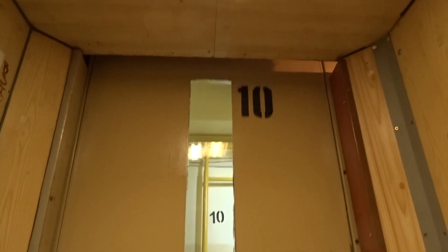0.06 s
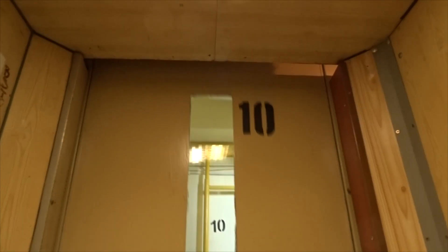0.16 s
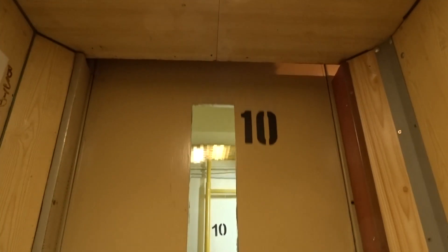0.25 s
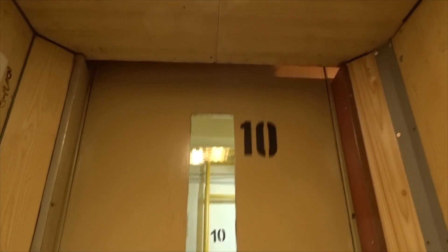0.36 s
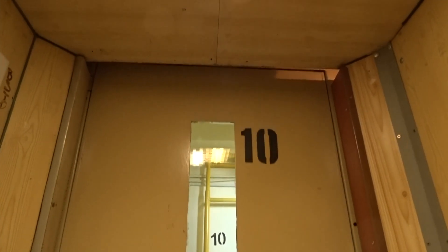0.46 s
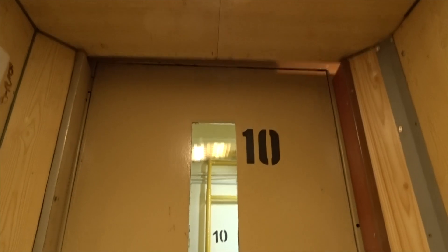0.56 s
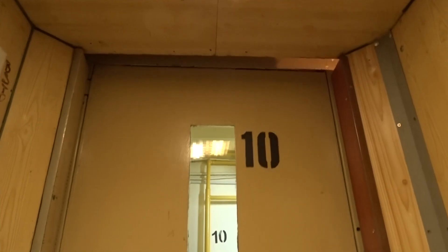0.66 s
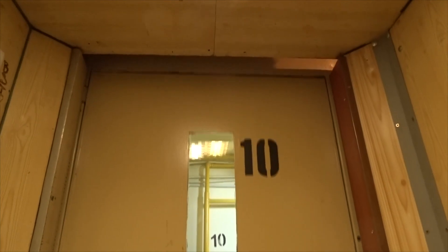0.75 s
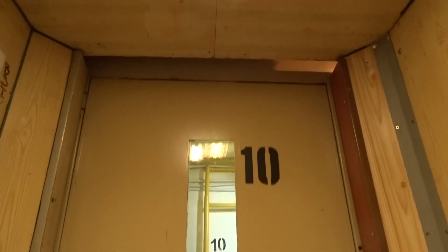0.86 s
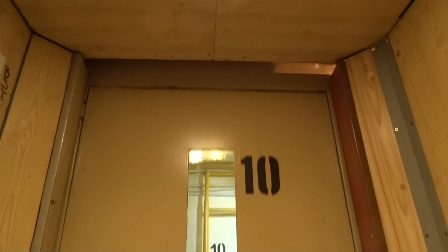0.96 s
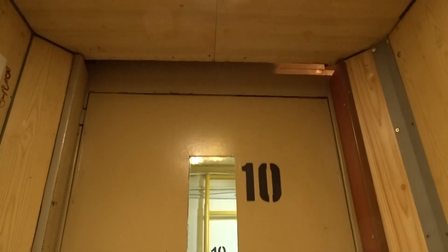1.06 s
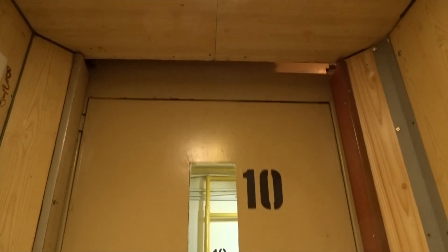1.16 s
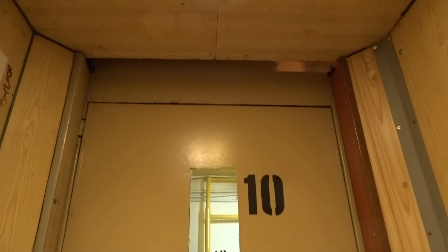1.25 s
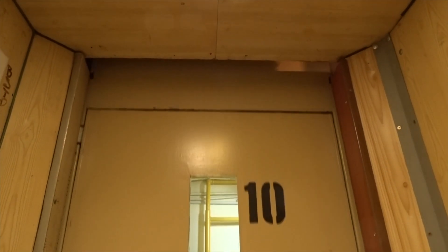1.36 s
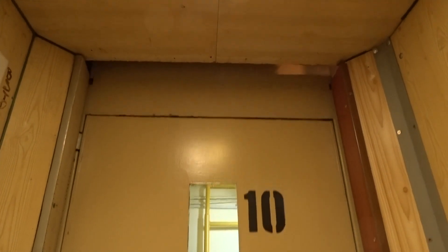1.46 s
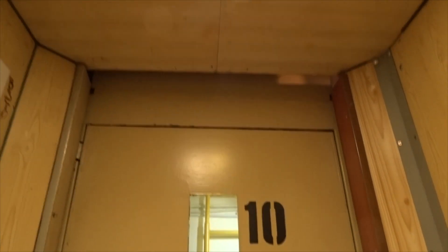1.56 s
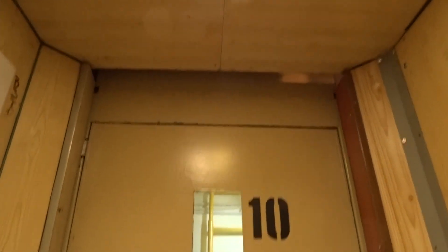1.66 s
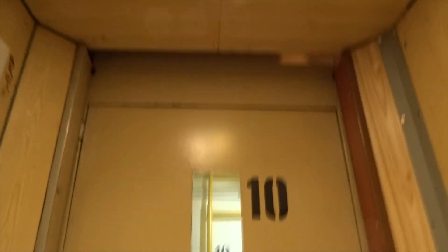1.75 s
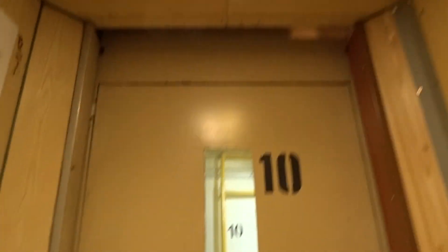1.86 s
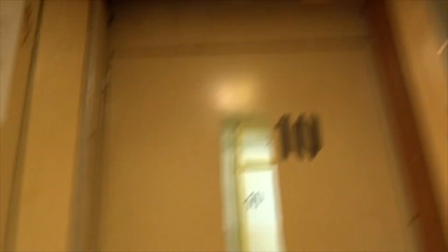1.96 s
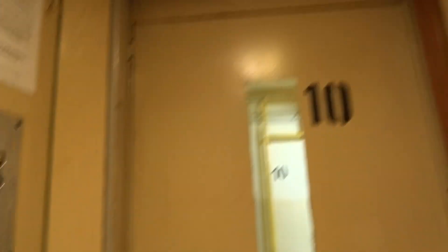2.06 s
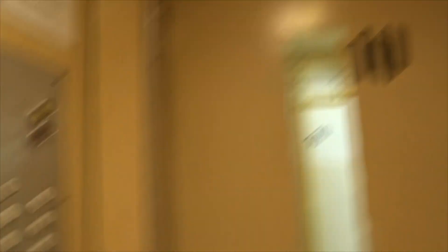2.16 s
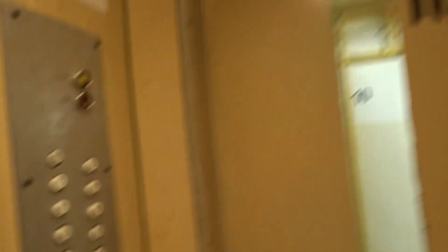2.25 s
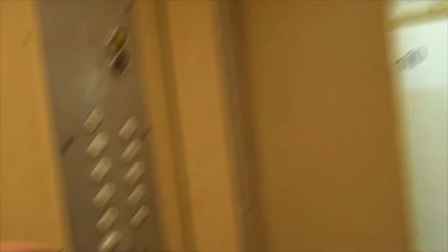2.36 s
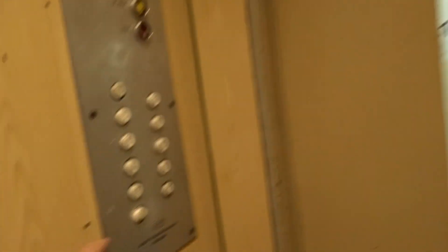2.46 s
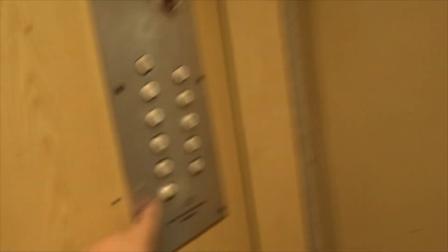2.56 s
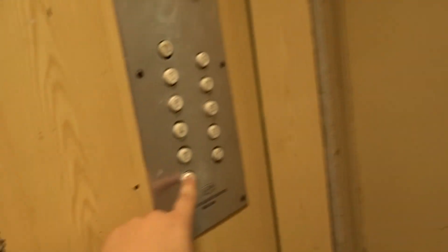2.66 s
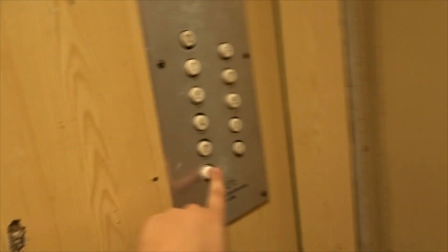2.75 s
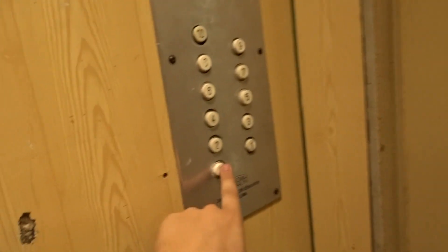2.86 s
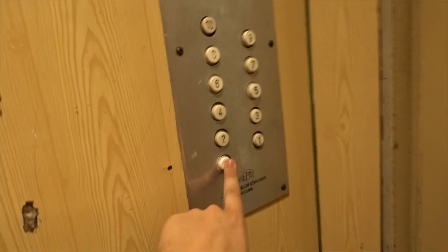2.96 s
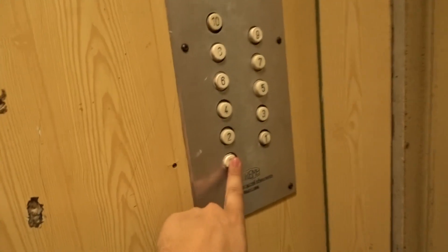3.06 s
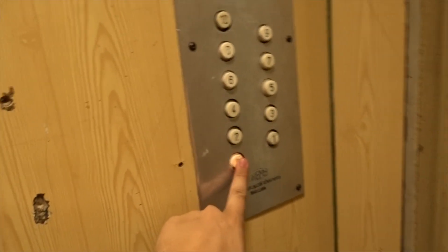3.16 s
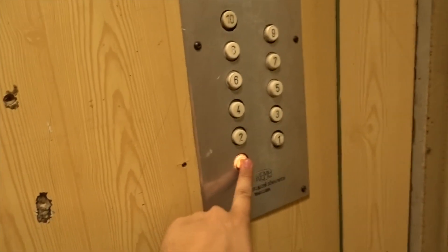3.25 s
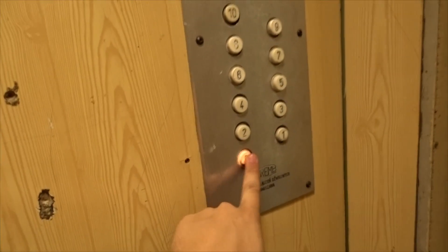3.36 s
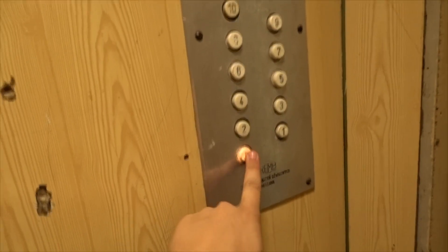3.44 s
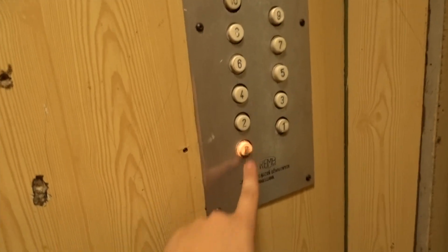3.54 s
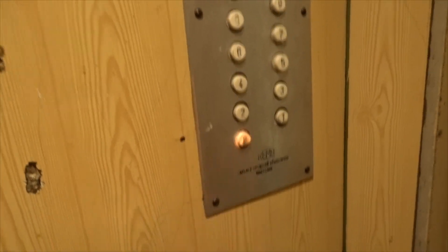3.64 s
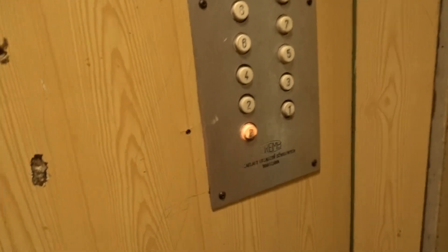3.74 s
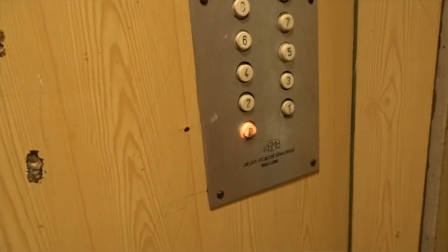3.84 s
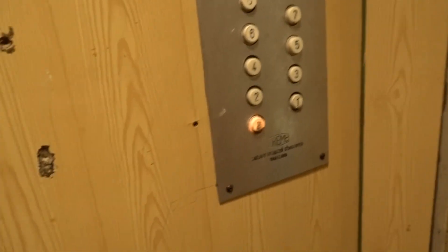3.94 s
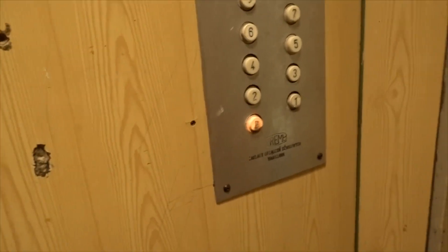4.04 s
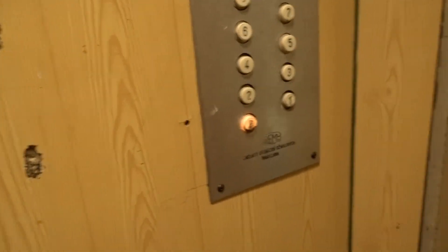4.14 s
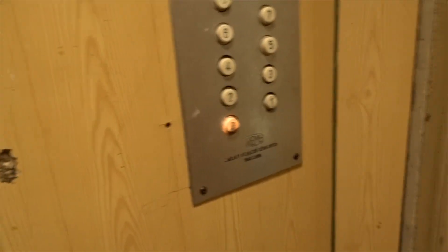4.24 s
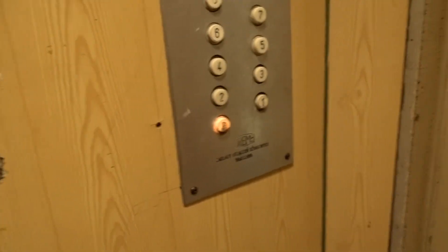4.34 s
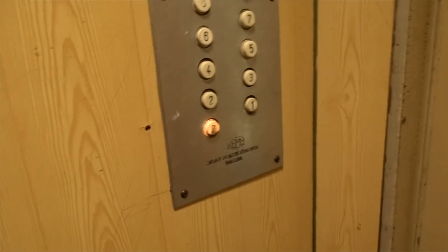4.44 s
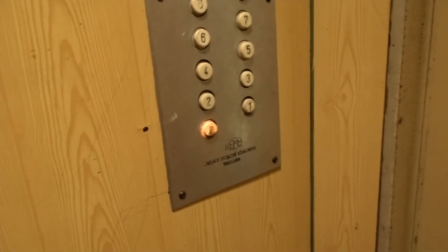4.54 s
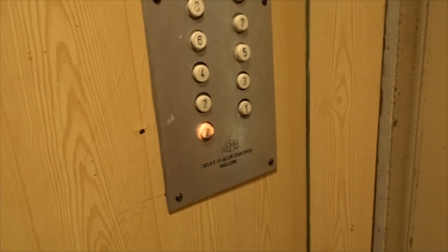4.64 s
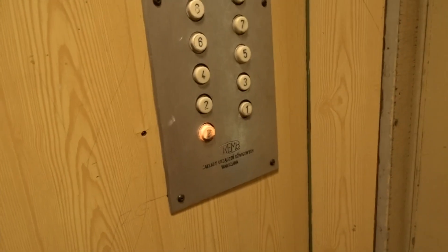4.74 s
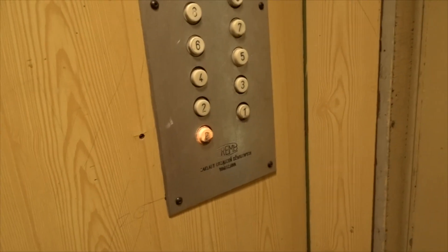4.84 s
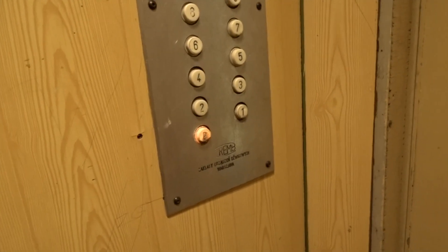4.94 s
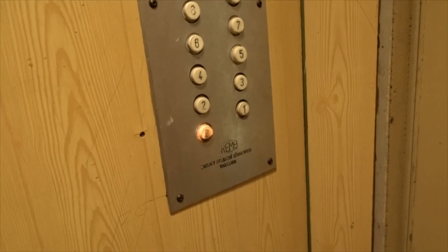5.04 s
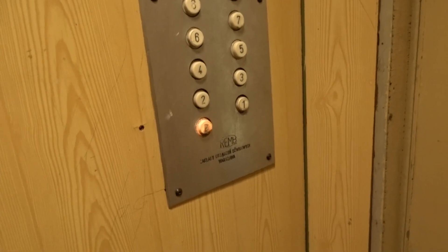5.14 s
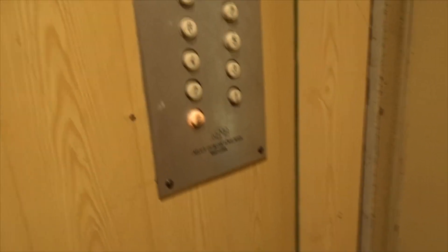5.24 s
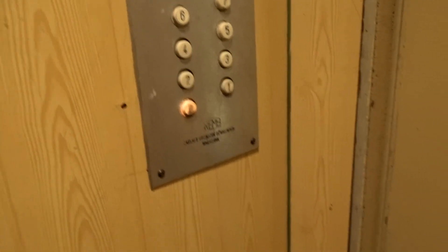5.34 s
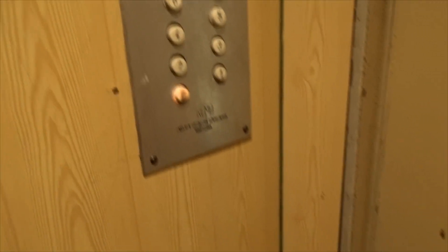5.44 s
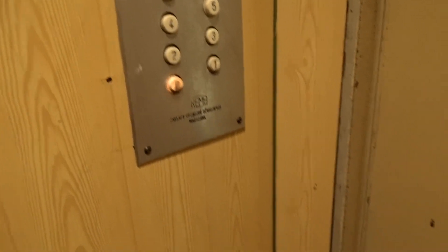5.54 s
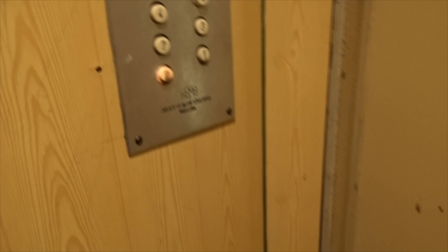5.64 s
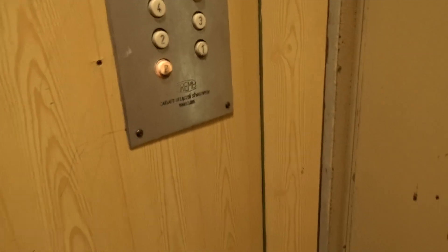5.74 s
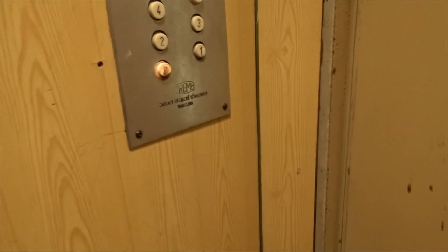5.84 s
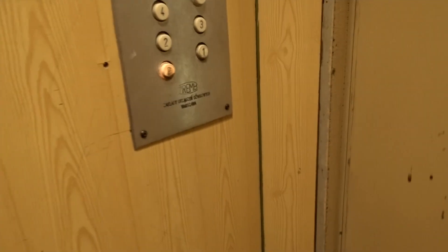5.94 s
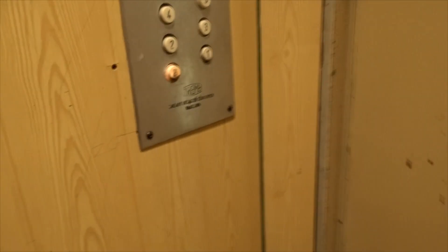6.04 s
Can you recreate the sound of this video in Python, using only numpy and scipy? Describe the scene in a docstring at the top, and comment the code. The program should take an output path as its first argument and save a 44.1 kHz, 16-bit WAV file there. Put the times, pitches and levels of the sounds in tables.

```python
"""Knocks ring the parts of a small wooden lift cabin: each is a burst of uneven contacts driving modes and bands.
The drive, shaped noise with gliding tones, rumbles and hums; the car stops and the door lock cam rattles home.
A button is pressed, relays knock, keys jingle as decaying modes, and clothes rustle as grainy hiss.
Thin metal sizzles as narrow resonances of noise; the lock cam pulls back with a bang and the car sets off.
A short diffuse tail encloses the knocks, ticks and keys over a faint noise floor with a wavering whir."""
import sys
import numpy as np
from scipy import signal
from scipy.fft import rfft, irfft
from scipy.io import wavfile
from scipy.ndimage import uniform_filter1d

SR = 44100
rng = np.random.default_rng(int(sys.argv[2]) if len(sys.argv) > 2 else 0)


def output_pcm(signal):
    """Save a mono or channel-first signal as 16-bit PCM at the path in sys.argv[1].

    Samples are clipped to [-1, 1] before scaling.
    """
    pcm = np.clip(np.atleast_2d(signal).T, -1, 1) * 32767
    wavfile.write(sys.argv[1], SR, np.round(pcm).astype(np.int16))


N = 268613
T = np.arange(N) / SR  # seconds

# Noise floor of the still cabin. Each row: frequency in Hz, relative density in dB per Hz.
STILL_SPECTRUM = [(18, -21), (30, 8.5), (156, -10.5), (641, -5), (811, -14), (1270, -2.5), (1830, -29),
                  (2500, -1.5), (3250, -22), (15600, -12)]
# Faint wavering whir in the cabin. Each row: centre in Hz, width in Hz, relative level in dB.
WHIR_RESONANCES = [(255, 21.5, -5.5), (670, 23, 2.5), (1036, 54, 2.5), (1253, 33, 5), (2532, 107, 3.5),
                   (3350, 170, -12)]
STILL_DB, WHIR_DB = -58.5, -61  # RMS levels; the whir also wavers

# Drive and guide shoes through the frame, the car swinging out; at standstill the rasp is mostly clothes.
# Each row: time in seconds, roar level in dB, rasp level in dB above the roar.
DRIVE_LEVELS = [(0, -28, -15.5), (.3, -35, -14.5), (.57, -41.5, -15), (1.05, -45.5, -17.5),
                (1.33, -40, -16), (1.9, -36, -6.5), (2.09, -39, -9.5), (2.34, -50, -3), (2.63, -55.5, 0.5),
                (3.36, -55.5, -5.5), (3.7, -56, -1.5), (4.0, -65.5, -1), (4.72, -68.5, 5.5),
                (5.1, -46, -5.5), (5.36, -53, -2.5), (5.68, -32.5, -17), (5.89, -39, -6.5),
                (6.09, -38.5, -13)]
# Spectra of rumble, roar and rasp. Each row: frequency in Hz, relative density in dB per Hz.
RUMBLE_SPECTRUM = [(12, -30), (20, -5.5), (43, 0.5), (91, -2.5), (103, 5), (129, -15), (178, -7.5),
                   (205, -42.5), (240, -4), (310, -50), (530, -120)]
ROAR_SPECTRUM = [(120, -8.5), (200, -6), (301, -1.5), (371, -4), (415, -3), (631, -3), (731, -4.5),
                 (855, -6.5), (1210, -14), (1390, -9), (1600, -19), (2080, -45), (3520, -120)]
RASP_SPECTRUM = [(1200, -36.5), (1600, -1.5), (2500, -3.0), (3500, -9.0), (5000, -21.5), (6500, -26.5)]
# Tones of the drive. Each row: start in seconds, end in seconds, first frequency in Hz, last frequency in Hz,
# first level in dB, last level in dB, throb depth in dB (negative inverts it), random waver in dB.
DRIVE_TONES = [(0.46, 1.6, 299, 300, -45.5, -41, 5, 2.5), (0.19, 0.92, 748, 722, -42.5, -55.5, 1, 0),
               (0.85, 1.35, 540, 590, -55, -46.5, 3, 2), (0.81, 1.1, 495, 497, -53, -49, -1, 3),
               (0.66, 1.014, 178, 160, -50, -52.5, 2, 2.5), (5.71, 5.82, 160, 190, -26, -32, 1, 1.5),
               (5.89, 6.03, 262, 268, -37, -42, -2, 6), (5.5, 6.09, 230, 390, -42.5, -42.5, 6, 2.5)]
RUMBLE_DB = 3  # above the roar
THROB_HZ, THROB_PEAK_S = 3.9, 0.8

# Movements of clothes close by. Each row: start in seconds, length in seconds before the decay, level in dB.
CLOTH_MOVEMENTS = [(1.307, 0.37, -51.5), (1.65, 0.44, -45), (2.126, 0.083, -45), (2.323, 0.17, -55.5),
                   (2.568, 0.15, -52), (2.876, 0.36, -49.5), (3.04, 0.078, -44.5), (3.438, 0.18, -54.5),
                   (3.716, 0.064, -52), (4.298, 0.092, -56), (4.649, 0.15, -55), (4.948, 0.35, -52),
                   (5.5, 0.44, -52)]
# Spectrum of rubbing fabric. Each row: frequency in Hz, relative density in dB per Hz.
CLOTH_SPECTRUM = [(2350, -28.5), (4000, -4), (5190, -4.5), (6290, -9.5), (6740, -5), (8600, -2),
                  (9960, -6.5), (11500, -13), (15500, -16.5)]
RUSTLE_RISE_S, RUSTLE_T60_S = 0.042, 1

# Thin metal chattering while the lock magnet pulls. Each row: centre in Hz, width in Hz, relative level in dB.
SIZZLE_RESONANCES = [(6800, 46, -13), (6980, 22, -1), (7200, 41, -9), (7600, 35, -6.5), (8700, 29, -2),
                     (8790, 87, 2), (9000, 43, -6), (9480, 55, 2)]
# Course of that chatter. Each row: time in seconds, level in dB.
SIZZLE_LEVELS = [(4.9, -68), (4.95, -49.5), (5.1, -57), (5.2, -54), (5.25, -71)]

# Modes of the keys. Each row: frequency in Hz, mean relative level in dB, t60 in seconds.
KEY_MODES = [(3432, 3, 0.098), (7400, -18, .2), (8700, 0.5, 0.13), (10000, -1.5, 0.15), (11020, -4, .1),
             (11760, -8, 0.2), (14100, -4, 0.102)]
# Keys touching. Each row: start in seconds, relative level in dB, share of scrape from 0 to 1.
KEY_TOUCHES = [(4.206, -25, 0.75), (4.213, -25.5, 0.62), (4.232, -44, 0.65), (4.246, -43, 0.43),
               (4.264, -23.5, 0.04), (4.284, -23, 0), (4.302, -36, 0.37)]
# Spectrum of scraping keys. Each row: frequency in Hz, relative density in dB per Hz.
SCRAPE_SPECTRUM = [(710, -33), (1200, -14), (1860, -14), (2540, 0), (3650, -9.5), (6240, -12), (6800, -2),
                   (12200, -17), (15500, -29)]

# Dry ticks close by. Each row: start in seconds, peak level in dB, centre in Hz.
SNAPS = [(2.116, -21.5, 2060), (2.1661, -15, 3120), (2.9283, -37.5, 2140), (2.9752, -29, 8780),
         (3.039, -22, 4700), (3.1294, -40.5, 7070), (5.8265, -20.5, 2910)]

# Knocks and rattles of the car. Each row: start in seconds, force in dB, heft in dB (more bass when heavy),
# hardness in dB (more treble when metal meets metal), rattle length and tail t60 in seconds before part scaling.
CAR_KNOCKS = [(0.193, -39.5, 14.5, -30, 0.02, 0.57), (1.383, -25.5, 8.5, -16, 0.089, 0.55),
              (1.456, -11, -24, -8.5, 0.02, 0.3), (1.467, -10, -33, 7, 0.0156, 0.36),
              (1.496, -9, -19, -5.5, 0.058, 0.49), (1.547, -14.5, -3.5, 4, 0.023, 0.43),
              (1.683, -21, -4, -28, 0.021, 0.6), (1.741, -17.5, -7, -2.5, 0.01, 0.33),
              (2.156, -29.5, -6, -9, 0.0083, 0.14), (2.173, -39, 3, 5.5, 0.017, 0.55),
              (2.441, -55.5, 10, 22.5, 0.019, 0.14), (4.791, -61, 18, 1, 0.098, .3),
              (4.886, -30, -6, -18.5, 0.064, 0.54), (5.068, -37.5, -25, -2, 0.061, 0.96),
              (5.2, -43, 2, 6.5, 0.018, 0.18), (5.371, -46, 0, 4, 0.024, 0.31),
              (5.396, -32, -14, 9, 0.051, .3), (5.426, -13.5, -10, 3, 0.045, 0.14),
              (5.459, -11.5, -4, 1.5, 0.0387, 0.15), (5.492, -15.5, -1, 1.5, 0.028, 0.33),
              (5.591, -30.5, 7.5, -18, 0.012, 0.3), (5.705, -31.5, 4.5, 3.5, 0.036, 0.94)]
# Finger and button on the wall panel, light and woody. Each row: start in seconds, force in dB,
# hardness in dB, rattle length and tail t60 in seconds before part scaling.
BUTTON_PRESSES = [(3.031, -40, 11, 0.012, 0.57), (3.08, -39, 8.5, 0.025, 0.59), (3.161, -43, 3, 0.11, 0.66),
                  (3.392, -37.5, -16, 0.023, 0.23), (3.482, -34.5, -3.5, 0.025, 0.54),
                  (3.569, -34.5, -1.5, 0.014, 0.17)]
PANEL_HEFT_DB, PANEL_WOOD_DB = -17.5, 8
# Lurches of the car on its ropes as the brake opens, in the thump alone.
# Each row: start in seconds, force in dB, length and tail t60 in seconds before part scaling.
ROPE_LURCHES = [(5.51, -12, 0.016, 0.25), (5.6, -31, 0.025, 0.43), (5.715, -29.5, .045, 0.54)]
# Take of each part (thump, boom, wood, plate, clatter, crack) from a knock.
# Each row: offset in dB, share of the heft, share of the hardness.
PART_TAKES = [(-19, .9, 0.15), (-1, 1, -0.13), (-0.5, .3, -0.023), (-1.5, 0.016, -0.079), (-5, 0.17, 0.64),
              (-13, 0.083, 0.72)]
# Parts of the car as bands, in the same order. Each row: low edge in Hz, high edge in Hz,
# power share of plain broad response, factor on rattle length and tail.
PART_BANDS = [(30, 47, 0.3, 1.25), (64, 180, 0.094, 1), (245, 490, 0.282, 0.88), (492.8, 1206, 0.744, 0.96),
              (1213, 4100, 0.87, 0.67), (5600, 9900, 0.96, 0.59)]
# What the car rings with, from the box of air to the door plate.
# Each row: frequency in Hz, relative level in dB, t60 in seconds before the decay factor.
CAR_MODES = [(46.786, -2.5, .4), (93.5, 1, 0.18), (147.6, -5, 0.39), (175, -9.5, 0.14), (252.3, 1.5, 0.38),
             (280.5, -4, 0.31), (328, -0.5, 0.3), (355.5, -1, 0.2), (415, 0.5, 0.112), (477.7, 3.5, 0.23),
             (521.6, -4.5, 0.47), (553, -1, 0.12), (643, -1.5, 0.283), (700, -0.5, 0.31),
             (833, -10.5, 0.057), (919, -8.5, 0.268), (996.4, -4, 0.15), (1061, 0, 0.135),
             (1160, -23.5, 0.34), (1314, -5, 0.34), (1646, -3, 0.094), (1830, 5, 0.04), (2060, -2, 0.1),
             (2264, -9.5, 0.118), (2434, 3.5, .12), (2770, -13.5, 0.24), (2877, 2, 0.07),
             (3215, -13.5, .12)]

# Shaping of the diffuse side signal. Each row: frequency in Hz, gain in dB before the overall side gain.
SIDE_WIDTH = [(60, -29), (110, -31.5), (200, -17.5), (380, -16), (700, -9), (1290, -9), (2380, -6),
              (4400, -11.5), (8120, -13), (15000, -7.5)]
LEFT_DB = 1.4  # gain of the middle signal, left over right
CABIN_T60_S, CABIN_DB = 0.096, -11.5
TOP_HZ = 15750


def undb(db):
    """Amplitude ratio from level: twenty decibels per factor of ten."""
    return 10 ** (np.asarray(db) / 20)


def unit(x):
    """Normalisation to an RMS amplitude of one."""
    return x / np.sqrt(np.mean(x ** 2))


def shape(x, points):
    """Spectral filtering: (Hz, dB) points are joined on a logarithmic frequency axis."""
    hz, db = np.transpose(points)
    f = np.maximum(np.arange(N // 2 + 1) * SR / N, 1)
    gain = undb(np.interp(np.log(f), np.log(hz), db))
    return irfft(rfft(x) * gain, N)


def noise(points):
    """Coloured noise: white noise filtered to a given spectrum, at unit RMS."""
    return unit(shape(rng.standard_normal(N), points))


def fade(t, t60):
    """Exponential decay: amplitude falls by 60 dB in t60 seconds."""
    return np.exp(-np.log(1000) * np.maximum(t, 0) / t60) * (t >= 0)


def ring(modes):
    """Modal superposition: decaying sines of alternating sign form a unit-energy response."""
    t = T[:SR // 2]
    response = 0
    for k, (hz, db, t60) in enumerate(modes):
        response = response + (-1) ** k * undb(db) * fade(t, t60) * np.sin(2 * np.pi * hz * t)
    return response / np.linalg.norm(response)


def band(lo_hz, hi_hz):
    """Broad resonance: the unit-energy impulse response of a band-pass filter."""
    sos = signal.butter(2, [lo_hz, hi_hz], "band", fs=SR, output="sos")
    response = signal.sosfilt(sos, T[:SR // 4] == 0)
    return response / np.linalg.norm(response)


def through(x, response):
    """Linear response: the excitation is convolved with an impulse response."""
    return signal.oaconvolve(x, response)[:N]


def walk(rate):
    """Random modulation: levels drawn rate times a second, joined by ramps, spread a little under 1."""
    k = int(SR / rate)
    held = np.repeat(rng.standard_normal(N // k + 1), k)
    return uniform_filter1d(held, k)[:N]


def curve(table):
    """Linear interpolation of columns over time, with a gate that closes outside the table."""
    s, *columns = np.transpose(table)
    inside = np.clip(np.minimum(T - s[0], s[-1] - T) / 0.038 + 1, 0, 1)
    return inside, [np.interp(T, s, c) for c in columns]


def burst(s, db, hold, t60, rise_s=0.0031):
    """Force envelope: the power of a force that rises, holds and decays, cut 1.2 s after its start."""
    at = int(s * SR)
    t = T[at:int((s + 1.2) * SR)] - s
    force = undb(db) * np.clip(t / rise_s, 0, 1) * fade(np.maximum(t - hold, 0), t60)
    return at, force ** 2


def hiss_in(peaks):
    """Resonant filtering: one noise is heard through several narrow resonances, at unit RMS."""
    x = rng.standard_normal(N)
    total = np.zeros(N)
    for hz, width, db in peaks:
        b, a = signal.iirpeak(hz, hz / width, fs=SR)
        # the width sets the power passed, so it is divided out
        total += undb(db) / np.sqrt(width) * signal.lfilter(b, a, x)
    return unit(total)


def car_ring(lo_hz, hi_hz, decay_factor=0.92):
    """Modal response of the car in one band; a band without modes takes the highest one."""
    chosen = [row for row in CAR_MODES if lo_hz <= row[0] < hi_hz] or CAR_MODES[-1:]
    return ring([(hz, db, decay_factor * t60) for hz, db, t60 in chosen])


def still_air():
    """Noise floor: a steady coloured noise adds to a wavering whir in resonances."""
    floor = undb(STILL_DB) * noise(STILL_SPECTRUM)
    whir = undb(WHIR_DB + 4.0 * walk(7.4)) * hiss_in(WHIR_RESONANCES)
    return floor + whir


def tone(start, end, hz, last_hz, db, last_db, throb_db, waver_db):
    """Frequency and amplitude modulation: a drive tone glides while its level throbs and wavers."""
    inside, (hz, db) = curve([(start, hz, db), (end, last_hz, last_db)])
    throb = throb_db * np.cos(2 * np.pi * THROB_HZ * (T - THROB_PEAK_S))
    level = undb(db + throb + waver_db * walk(15))
    phase = 2 * np.pi * np.cumsum(hz) / SR
    return inside * level * np.sqrt(2) * np.sin(phase)


def drive():
    """Structure-borne sound: rumble, roar and rasp (at standstill mostly clothes) flicker beneath hum and whine."""
    _, (roar_db, rasp_db) = curve(DRIVE_LEVELS)
    # part of the vibration comes through the frame and takes on the ring of the car
    low_frame = unit(through(noise(RUMBLE_SPECTRUM), car_ring(30, 220, decay_factor=1.6)))
    high_frame = unit(through(noise(ROAR_SPECTRUM), car_ring(220, 1500, decay_factor=3.9)))
    rumble = unit(noise(RUMBLE_SPECTRUM) + 0.67 * low_frame)
    roar = unit(noise(ROAR_SPECTRUM) + 0.57 * high_frame)
    rumble = undb(RUMBLE_DB + 1.3 * walk(5.4)) * rumble
    roar = undb(1.9 * walk(24)) * roar
    rasp = undb(rasp_db + 1.7 * walk(28)) * noise(RASP_SPECTRUM)
    tones = sum(tone(*row) for row in DRIVE_TONES)
    return undb(roar_db) * (rumble + roar + rasp) + tones


def rustle():
    """Friction noise: rubbing fabric gives a grainy high hiss that swells with each movement."""
    power = np.zeros(N)
    for s, length, db in CLOTH_MOVEMENTS:
        at, rub = burst(s, db, length, RUSTLE_T60_S, RUSTLE_RISE_S)
        power[at:at + len(rub)] += rub
    grains = rng.standard_normal(N) * undb(1.506 * rng.exponential(size=N))
    return np.sqrt(power) * undb(2.1 * walk(23)) * unit(shape(grains, CLOTH_SPECTRUM))


def lock_magnet():
    """Resonance of thin metal: chatter sounds as a high sizzle before the lock releases."""
    inside, (db,) = curve(SIZZLE_LEVELS)
    return inside * undb(db + 1.9 * walk(33)) * hiss_in(SIZZLE_RESONANCES)


def keys():
    """Impact and friction: each touch mixes a brief scrape with a ring of freshly drawn mode strengths."""
    out, scrape = np.zeros(N), noise(SCRAPE_SPECTRUM)
    for s, db, share in KEY_TOUCHES:
        modes = [(hz, mode_db + 3 * rng.standard_normal(), t60) for hz, mode_db, t60 in KEY_MODES]
        chime = ring(modes)
        chime /= np.max(np.abs(chime))
        out[int(s * SR):][:len(chime)] += undb(db - 3.5) * (1 - share) * chime
        out += undb(db - 8.5) * share * fade(T - s, 0.34) * scrape
    return out


def ticks(t60=0.017):
    """Transient excitation: short decaying noise passes a broad band around each centre."""
    out = np.zeros(N)
    for s, db, hz in SNAPS:
        click = rng.standard_normal(1024) * fade(T[:1024], t60)
        response = band(hz / 3.1, min(hz * 1.6, 16000))
        snap = signal.oaconvolve(click, response)[:SR // 20]
        out[int(s * SR):][:len(snap)] += undb(db) * snap / np.max(np.abs(snap))
    return out


def blows():
    """Distribution of force: heft feeds the bass parts and hardness the treble parts of each blow."""
    rows = [(0, *lurch) for lurch in ROPE_LURCHES]
    for part, (offset_db, low, high) in enumerate(PART_TAKES):
        for s, db, heft_db, hard_db, hold, t60 in CAR_KNOCKS:
            rows.append((part, s, db + offset_db + low * heft_db + high * hard_db, hold, t60))
        wood_db = PANEL_WOOD_DB * (part == 2)
        for s, db, hard_db, hold, t60 in BUTTON_PRESSES:
            level_db = db + offset_db + low * PANEL_HEFT_DB + high * hard_db + wood_db
            rows.append((part, s, level_db, hold, t60))
    return rows


def knocks(grain_db=2.5):
    """Forced vibration: uneven contacts ring the parts of the car, and the treble parts die sooner."""
    power = np.zeros((len(PART_BANDS), N))
    for part, s, db, hold, t60 in blows():
        lasting = PART_BANDS[part][-1]
        at, push = burst(s, db, hold * lasting, t60 * lasting)
        power[part, at:at + len(push)] += push
    sizes = np.minimum(rng.exponential(size=N), 6)
    contacts = unit(rng.standard_normal(N) * undb(grain_db * sizes + 1.7 * walk(70)))
    out = 0
    for force, (lo_hz, hi_hz, broad, _) in zip(np.sqrt(power) * contacts, PART_BANDS):
        modal = np.sqrt(1 - broad) * through(force, car_ring(lo_hz, hi_hz))
        plain = np.sqrt(broad) * through(force, band(lo_hz, hi_hz))
        # alternate signs keep neighbouring band filters from cancelling where they overlap
        out = -out + modal + plain
    return out


def cabin(x):
    """Diffuse reverberation: a unit-energy noise tail decays exponentially in the small cabin."""
    tail = rng.standard_normal(SR // 2) * fade(T[:SR // 2] - 0.003, CABIN_T60_S)
    return through(x, tail / np.linalg.norm(tail))


def scene():
    """Superposition: all sources share the middle, while a diffuse side signal separates left and right."""
    hits = knocks() + ticks() + keys()
    enclosed = hits + undb(CABIN_DB) * cabin(hits)
    mid = enclosed + drive() + rustle() + lock_magnet() + still_air()
    side = undb(-1.5) * shape(cabin(mid), SIDE_WIDTH)
    return np.array([undb(LEFT_DB / 2) * mid + side, undb(-LEFT_DB / 2) * mid - side])


def record(dry):
    """Saturation and band limiting: the loudest peaks are rounded and the top is cut."""
    rounded = 1.019 * np.tanh(dry / 1.256)
    low_pass = signal.ellip(14, 0.5, 80, TOP_HZ, fs=SR, output="sos")
    return signal.sosfilt(low_pass, rounded)


dry = scene()
out = record(dry)
output_pcm(out)
```